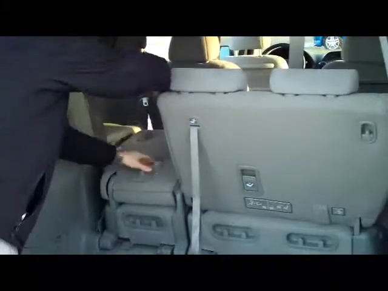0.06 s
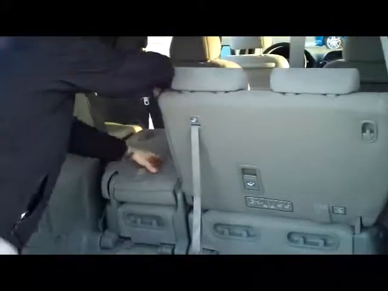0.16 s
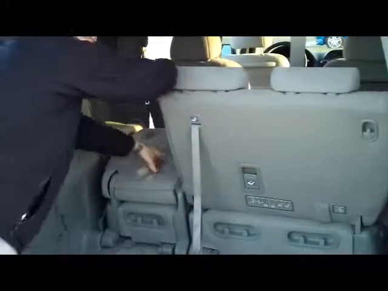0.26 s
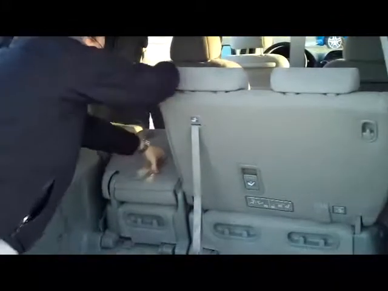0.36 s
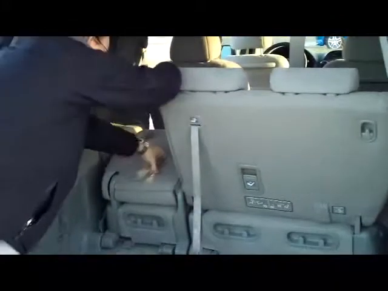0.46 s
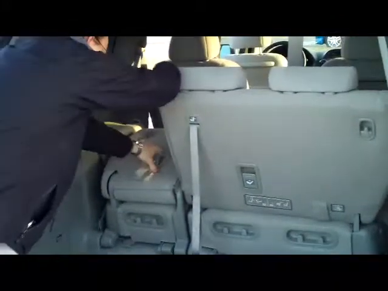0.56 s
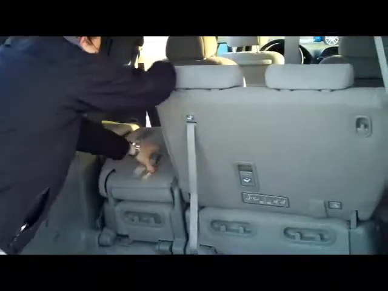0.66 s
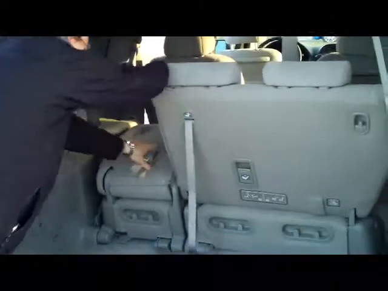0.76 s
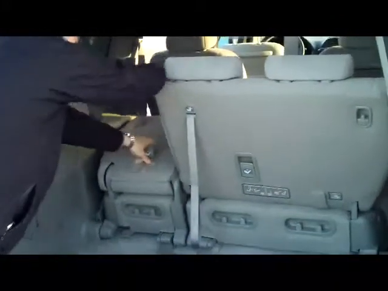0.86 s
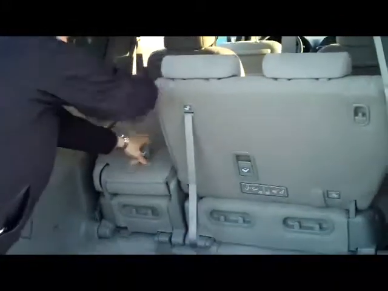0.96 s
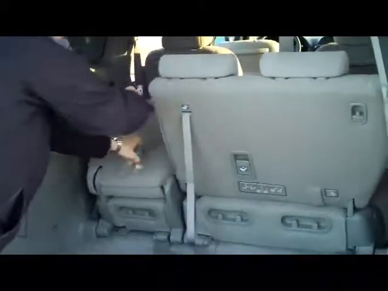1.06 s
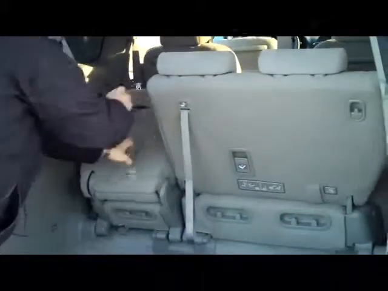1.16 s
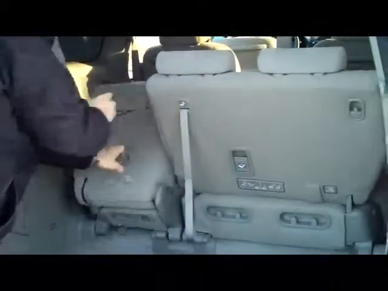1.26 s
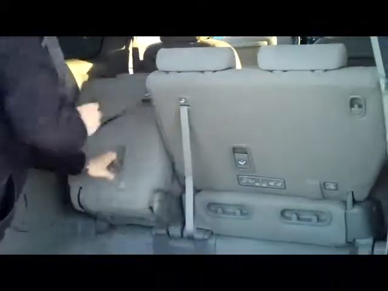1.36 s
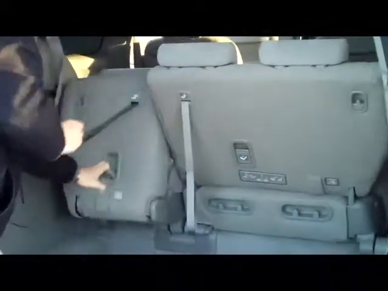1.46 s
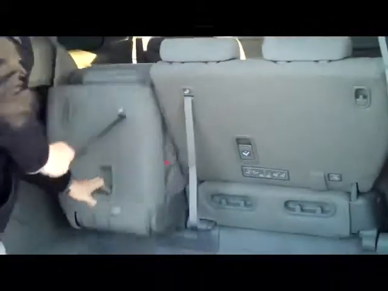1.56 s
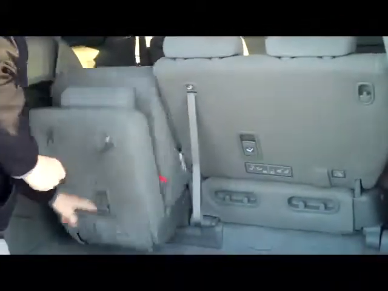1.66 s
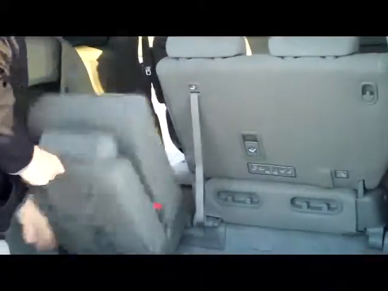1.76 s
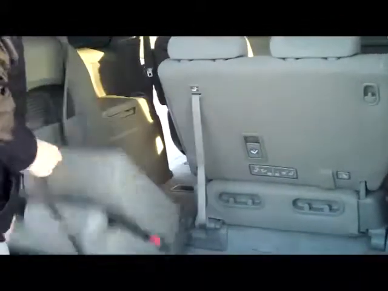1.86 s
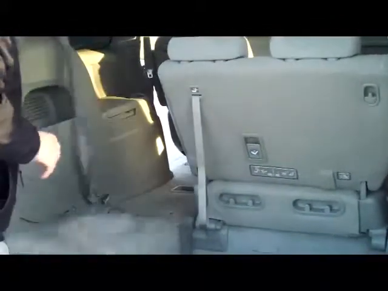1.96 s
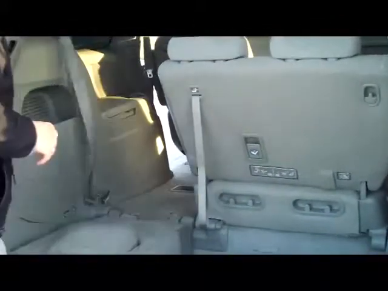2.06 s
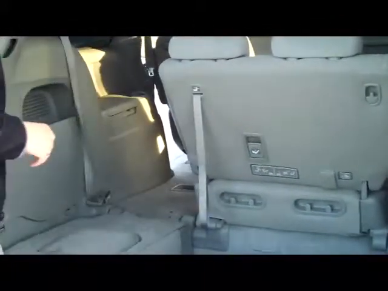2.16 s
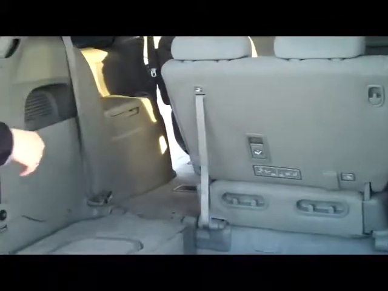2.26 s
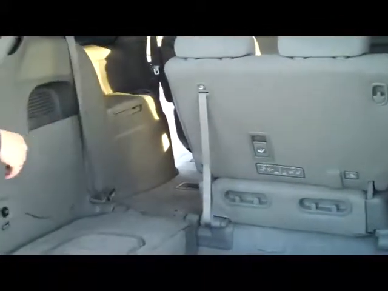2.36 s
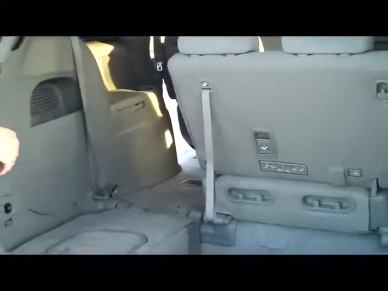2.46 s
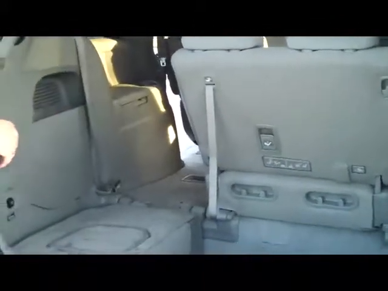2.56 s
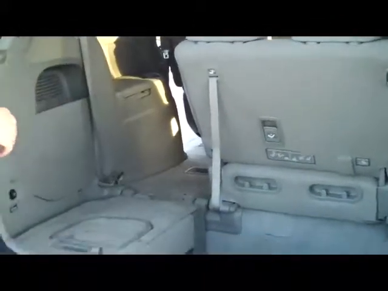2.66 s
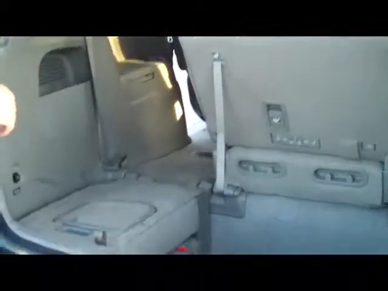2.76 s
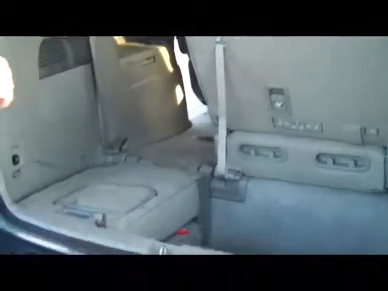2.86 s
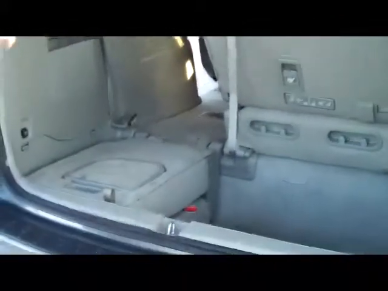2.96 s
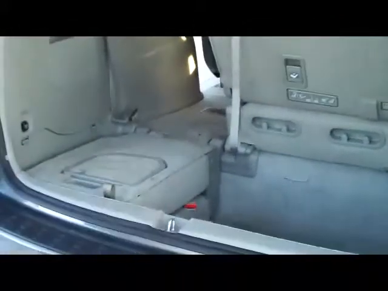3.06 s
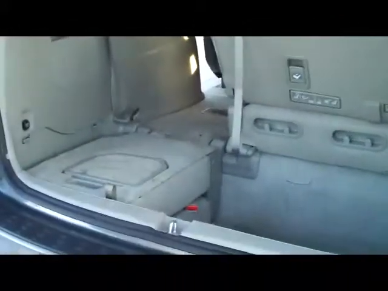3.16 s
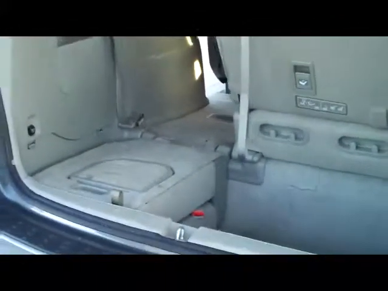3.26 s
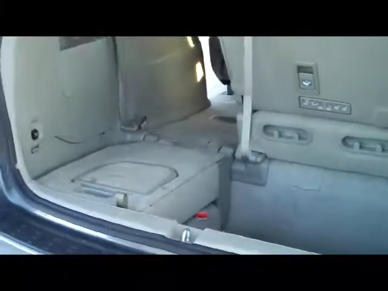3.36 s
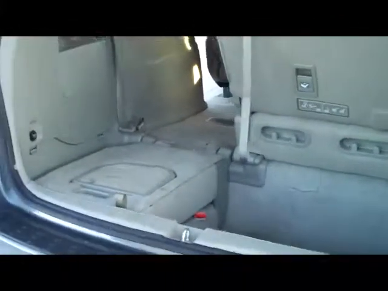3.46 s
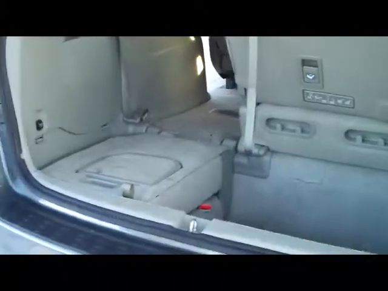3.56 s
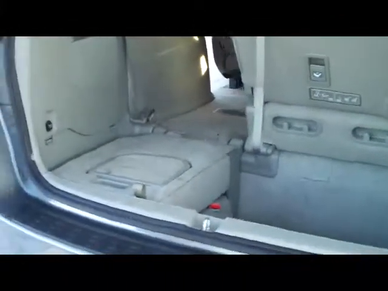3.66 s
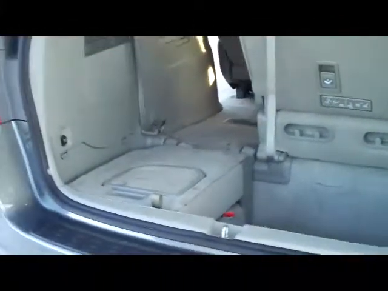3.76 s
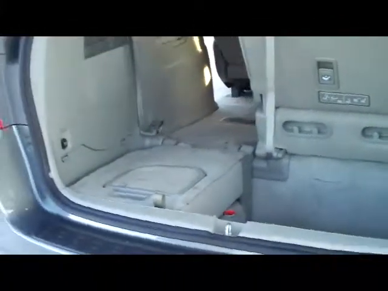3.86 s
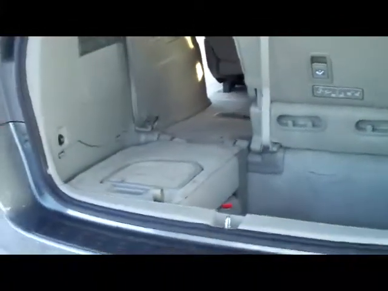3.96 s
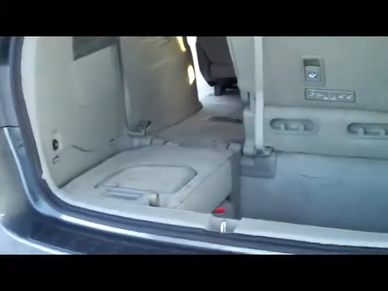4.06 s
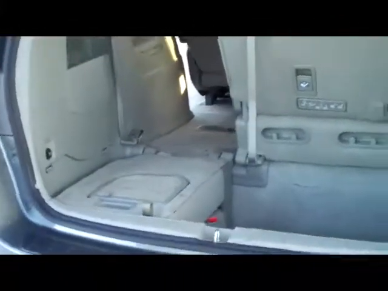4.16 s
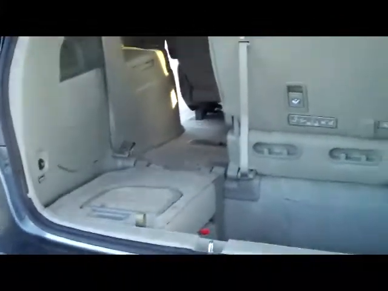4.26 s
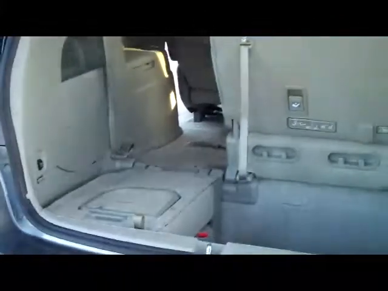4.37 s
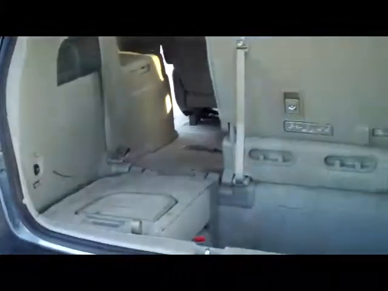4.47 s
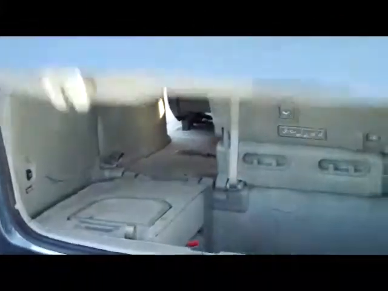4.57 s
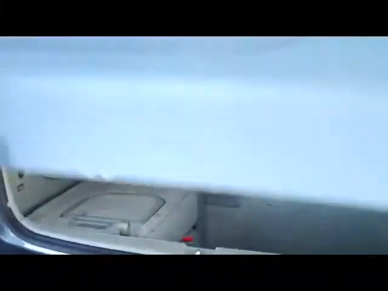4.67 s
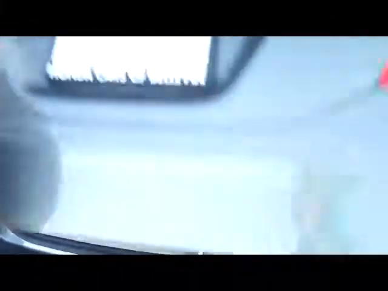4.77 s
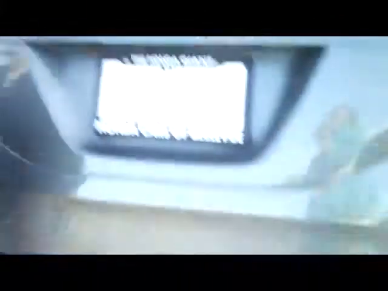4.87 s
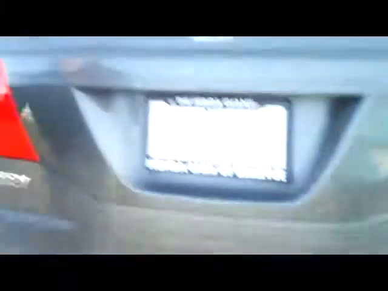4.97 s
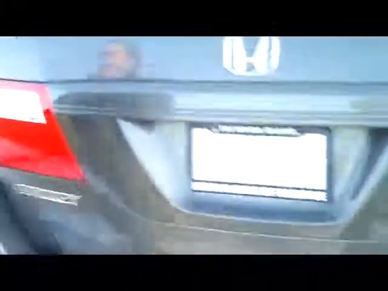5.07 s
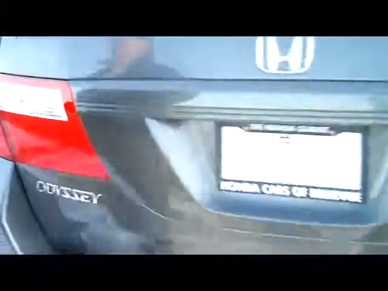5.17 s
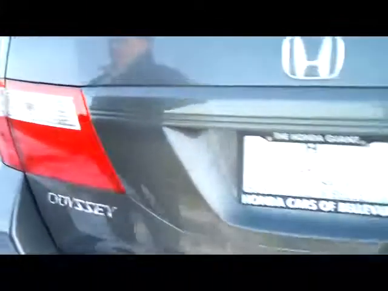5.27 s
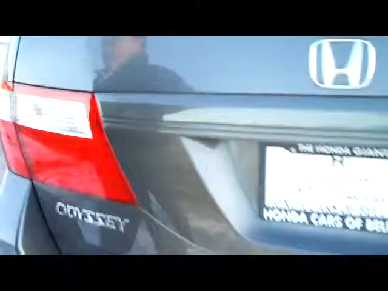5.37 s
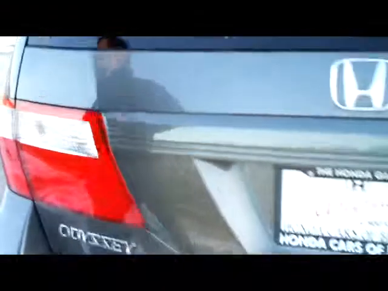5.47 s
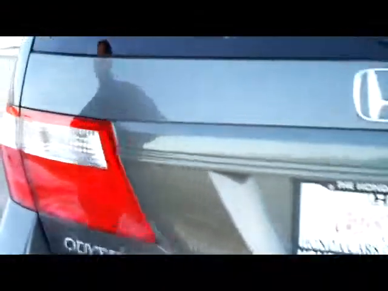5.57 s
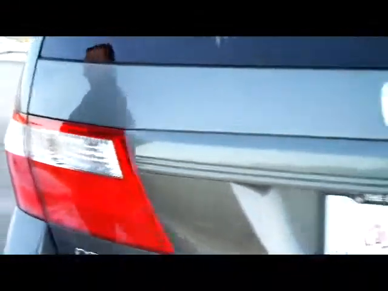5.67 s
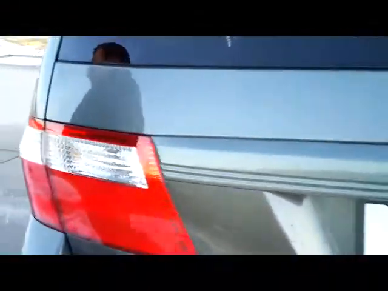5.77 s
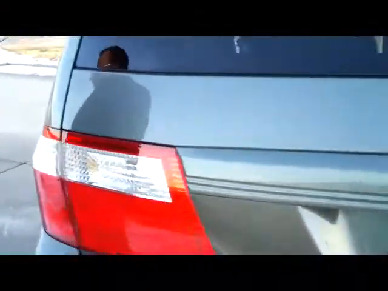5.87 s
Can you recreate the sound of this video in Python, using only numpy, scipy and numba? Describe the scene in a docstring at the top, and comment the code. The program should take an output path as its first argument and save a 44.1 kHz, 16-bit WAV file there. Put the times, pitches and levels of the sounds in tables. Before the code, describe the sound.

A small handheld camera, mono and slightly hissy, hears faint traffic outside an open van. Light knocks and creaks lead to a folding seat dropping heavily into the floor, with quick bouncing clatter and a short metal ring. Quiet foot scuffs follow. A sudden airy strut hiss accompanies the closing tailgate, thins out, and gives way to a huge deep slam with fluttering plastic rattles.

```python
"""Traffic rumble and a camera's thin whine come first, outdoors behind a van, as a hand works a strap.
Feet shuffle; the rear seat creaks, tumbles into its well and latches, all knocks of noise grit and struck modes.
Gas struts hiss as filtered jet noise while the tailgate swings down on whining hinges.
It slams, booms on damped low modes, and its trim rattles and buzzes with the shaking panel.
The small one-microphone camera cuts the top and clips the loudest peaks."""
import sys
import numpy as np
from scipy import signal
from scipy.fft import rfft, irfft
from scipy.io import wavfile
from scipy.ndimage import uniform_filter1d
from numba import njit

SR = 44100
rng = np.random.default_rng(int(sys.argv[2]) if len(sys.argv) > 2 else 0)


def generate_wav(signal):
    """Clip the signal to [-1, 1] and save it as 16-bit WAV at the path in sys.argv[1]."""
    frames = np.transpose(np.atleast_2d(signal))
    scaled = np.clip(frames, -1, 1) * 32767
    pcm = np.round(scaled).astype(np.int16)
    wavfile.write(sys.argv[1], SR, pcm)


N = 261513

# Slow swell of the rumble under the traffic: start_s, level_db
RUMBLE_SWELL = [(0, -23.5), (.16, -36.5), (.68, -40), (1.39, -40.5), (1.97, -33), (2.08, -43), (2.35, -40),
                (3.34, -40.5), (3.9, -35.5), (4.3, -35), (4.66, -38.5), (5.2, -40.5)]
# Spectrum of distant traffic and hiss, before levelling: pitch_hz, relative_db (per Hz)
TRAFFIC_SPECTRUM = [(14, -32), (24, 2.5), (44, 2), (160, -15.5), (314, -26.5), (360, -26.5), (401, -29.5),
                    (727, -26.5), (1780, -33.5), (1930, -38), (2150, -37.5), (2330, -40), (6700, -49),
                    (8780, -31.5), (15500, -65.5)]
TRAFFIC_DB = -50
# Steady camera whines: pitch_hz, level_db (rms)
CAMERA_WHINES = [(7865, -65), (11999, -81), (14987, -79)]
# Resonances of the microphone's cavity: pitch_hz, width_hz, relative_db
MIC_CAVITY = [(8270, 570, 5.5), (8890, 3500, -3.5)]
TICK_HZ = 100
TOP_HZ = 15300

# Upholstery, strap and clothes rubbing: start_s, scrape_db, swish_db
RUB_LEVELS = [(0, -38.5, -50), (.12, -66, -67), (.95, -62, -58.5), (1.1, -56, -60), (1.35, -43.5, -57),
              (1.68, -45.5, -67), (2.06, -46.5, -55), (2.16, -38.5, -49), (2.45, -50, -62.5),
              (2.66, -66, -67), (3.1, -55.5, -56), (3.42, -65, -63), (3.7, -46, -51.5), (3.9, -52.5, -57),
              (4.14, -51.5, -64), (4.45, -53.5, -48), (4.86, -48, -48), (5.16, -52.5, -49),
              (5.23, -42, -44)]
# Resonances of the cushion: pitch_hz, width_hz, relative_db
CUSHION_BODY = [(260, 114, 4), (666, 78, 5.5), (1018, 290, -3.5), (1714, 167, -2), (2490, 680, -10.5)]

# Knocks of feet, seat and tailgate; the hollow and sizzle levels are relative to the clack:
# start_s, clack_db, hollow_db, sizzle_db, clack_t60_s
SHUFFLE_KNOCKS = [(0.0678, -53, 8.5, -14, 0.16), (0.3947, -49, 0, -7, 0.16), (0.559, -54.5, 6, -7, 0.057),
                  (0.8242, -45, -12, -9, 0.11), (2.83, -52, 3.5, -9, 0.27), (2.86, -46, 7, -18, 0.11),
                  (2.88, -56.5, 14, -9, 0.28), (2.9579, -46, -7, 1, 0.068), (3.0355, -48, 17.5, -10, 0.058),
                  (3.156, -58, 13, 6, 0.061), (3.5107, -57, 6.5, 7.5, 0.23), (3.6037, -53.5, -9, 8, 0.29),
                  (3.6775, -44, -3, -15, 0.24), (3.8591, -50.5, 12, -1, .12), (4.018, -46, -3, 6.5, 0.11),
                  (4.1256, -50.5, 11, 18, .015), (4.134, -48.5, 11, -10, 0.061),
                  (4.922, -51.5, 12, 1, 0.092), (5.9049, -41, 10.5, -2.5, 0.068)]
SEAT_KNOCKS = [(1.0224, -42, -2.5, -21, 0.068), (1.099, -52.5, 6, -10, 0.046), (1.1172, -45.5, -10, 0, .04),
               (1.1713, -44, 4, 0, 0.032), (1.2729, -53, 9, 1, 0.15), (1.4199, -49, 2, -5, 0.18),
               (1.5001, -51, -20, -7, 0.41), (1.7366, -54.5, 20.5, -13, .04),
               (1.7748, -49.5, 19.5, -6, .07), (1.807, -38.5, -8, -13, 0.11),
               (1.8402, -24.5, -9, 12.5, 0.037), (1.8713, -28, -12.5, -11, 0.034),
               (2.098, -40, -9.5, 10, 0.067), (2.112, -47, -16.5, 14, 0.14),
               (2.1346, -31.5, -22.5, 1, 0.018), (2.1722, -32.5, 12, 9.5, 0.06),
               (2.1972, -7, 0.5, -5.5, 0.039), (2.212, -28, 1, -5, 0.085), (2.2465, -21.5, -1, -9, 0.06),
               (2.3007, -21, -2, -13, 0.062), (2.3489, -42, 13, -2, 0.085), (2.3675, -35, -10, -8, 0.062)]
GATE_KNOCKS = [(5.234, -47, 22.5, -9, 0.052), (5.2426, -14.5, 14.5, -1, .02), (5.249, -25, 5, 4, 0.029),
               (5.276, -31, 13, -5, 0.093), (5.3056, -26.5, 8, -4, 0.16), (5.342, -23.5, 2, -13, 0.044),
               (5.357, -20.5, -14, -22, 0.051)]
# Rise of a knock as a share of its t60
SHUFFLE_RISE, SEAT_RISE, GATE_RISE = 0.036, 0.077, .045

# Resonances that colour the knocks: pitch_hz, width_hz, relative_db
SEAT_RESONANCES = [(109.5, 17, -7.5), (143, 59, 8.5), (180.6, 22, 8.5), (221.3, 12, 6), (302, 40, -0.5),
                   (426, 100, 5), (571.5, 18, 7), (626, 42, 4), (1040, 71, -2), (2000, 32, 4),
                   (2546, 27, 2), (3053, 130, 9), (4810, 67, -24.5)]
GATE_RESONANCES = [(135, 32, 10), (175, 9.5, 15.5), (450, 610, -11), (220, 29, 11.5), (279, 12, 9),
                   (319, 32, 11), (648, 46, -2), (890, 50, -33), (1092, 61, 5.5), (1380, 87, 3.5),
                   (1850, 220, -5.5), (2450, 43, 3), (3170, 200, -5), (3380, 39, -15), (4100, 170, -23)]
# Blows that shake the low modes: start_s, strength_db, contact_s
SEAT_PUSHES = [(2.156, 2, 0.00099), (2.181, -10, 0.0031), (2.2, 0, 0.0037), (2.228, 0, 0.0052),
               (2.296, -15.5, 0.0043), (2.347, -8.5, 0.0053)]
GATE_PUSHES = [(5.241, -1.5, 0.0018), (5.28, -1.5, 0.0051), (5.303, 1.3, 0.0034), (5.314, 2.5, 0.0043),
               (5.343, -6.5, 0.0083), (5.379, -2.5, 0.0043), (5.416, -12.5, 0.0072)]
# Damped modes: pitch_hz, relative_db, t60_s, first_swing (1 toward the microphone, -1 away)
SEAT_MODES = [(23.6, -27, 1, 1), (41.1, -17.5, 0.23, -1), (63.24, -28, 1, -1), (115, -19.5, 0.12, -1),
              (159, -25, 0.17, 1), (181, -24.5, 0.23, -1), (229, -28, 0.17, 1)]
GATE_MODES = [(17.1, -1.5, 0.33, -1), (23.63, -2.5, 0.94, 1), (36.1, -3, 1.1, 1), (43.26, -25.5, 1.54, 1),
              (70.7, -24.5, 1.66, -1), (114.6, -13.5, 0.22, -1), (194.7, -27, 0.52, 1), (1070, -32, 1.0, 1)]
# The latch bar ringing on: pitch_hz, level_db, t60_s, first_swing (1 or -1)
LATCH_MODES = [(352, -55, 4.6, 1), (2073, -49, 2.2, 1), (3000, -60.5, 0.76, 1), (3290, -30, 0.36, 1)]
LATCH_S = 2.2

# Seat pivots and handle groaning under load: start_s, length_s, first_hz, last_hz, level_db
PIVOT_CREAKS = [(1.17, .14, 560, 826, -50), (1.32, .08, 805, 720, -57), (1.41, 0.15, 700, 650, -45.5),
                (1.685, 0.087, 1055, 960, -52), (4.015, .17, 553, 527, -49)]
# The tailgate's hinges whining as it swings: start_s, length_s, first_hz, last_hz, level_db
HINGE_CREAKS = [(4.36, 0.31, 462, 503, -52.5), (4.57, .19, 500, 533, -51.5),
                (4.765, 0.083, 376, 373, -46.5), (4.84, .11, 530, 596, -59)]
# Strands that glide together in a creak: pitch_multiple, width_hz, relative_db
PIVOT_STRANDS = [(1, 50., 0), (1.62, 70., -3), (2.75, 120., -5), (3.3, 140., -6)]
HINGE_WHINE_STRANDS = [(1, 25., 0), (2, 35., -3), (3, 50., -9)]

# Gas forced through the strut valves, around which levels and pitch waver:
# start_s, hiss_db, whistle_hz, whistle_db
STRUT_GAS = [(4.22, -68, 5540, -76), (4.33, -44.5, 5800, -55), (4.372, -41.5, 6300, -50),
             (4.404, -36.5, 6950, -30), (4.47, -34.5, 6680, -38), (4.57, -35, 7140, -44),
             (4.67, -43.5, 7230, -47.5), (4.8, -47, 6900, -48), (5.025, -47.5, 6950, -49),
             (5.05, -56, 6900, -72), (5.2, -64, 6900, -79)]
# Resonances of the strut tubes: pitch_hz, width_hz, relative_db
STRUT_TUBE = [(7450, 400, -2), (9710, 180, 0), (10400, 200, 0), (11300, 200, 0), (12300, 180, 2),
              (13400, 400, 1), (14400, 400, -4)]
# Whistles that stay near one pitch; follow_share is how much of the hiss's swell in dB they follow:
# pitch_hz, filter_width_hz, level_db (at the loudest hiss), follow_share
STRUT_WHISTLES = [(8400, 380., -38, .95), (5650, 130., -53, .4), (4950, 120., -60, .4),
                  (3550, 160., -64, .3)]

SLAM_S = 5.24
# The shut panel swings on: first rattle, first swing, each swing this share of the last
RATTLE_S, SWING_S, QUICKENS = 5.3225, .0632, .968
RATTLE_COUNT = 7  # swings
# Trim hits on each swing, before the fade; hollow and sizzle are relative to the clack:
# swing_share, clack_db, hollow_db, sizzle_db, clack_t60_s
TRIM_HITS = [(0, -13, -13, -7, 0.052), (.52, -23, 3.5, -7, 0.13)]
# Levels lost FADE_S after the slam, slowly at first
RATTLE_FADE_DB, BUZZ_FADE_DB, FADE_S, FADE_POWER = 37, 26, .43, 3.08
# Loose trim buzzing between the rattles: level, with hollow part and sizzle relative to it
BUZZ_DB, BUZZ_HOLLOW_DB, BUZZ_SIZZLE_DB = -32, 6, -6
LINGER_DB, LINGER_T60_S = -45, 2.76  # a faint part of the buzz dies slowly


def undb(db):
    """Decibels to amplitude."""
    return 10 ** (np.asarray(db) / 20)


def unit(x):
    """Scale to rms 1."""
    return x / np.sqrt(np.mean(x ** 2))


def curve(table):
    """Columns at every sample, joined by straight lines."""
    s, *columns = np.transpose(table)
    t = np.arange(N) / SR
    return [np.interp(t, s, column) for column in columns]


def inside(table, fade_s=.03):
    """1 while a curve lasts, fading to 0 around it."""
    t = np.arange(N) / SR
    margin_s = np.minimum(t - table[0][0], table[-1][0] - t)
    return np.clip(margin_s / fade_s + 1, 0, 1)


@njit
def svf(x, hz, width):
    """State-variable band-pass with a moving centre, gain 1 there."""
    y, b, l = np.empty(len(x)), 0., 0.
    for i in range(len(x)):
        g, k = np.tan(np.pi * hz[i] / SR), width / hz[i]
        v = (b + g * (x[i] - l)) / (1 + g * (g + k))
        b, l, y[i] = 2 * v - b, l + 2 * g * v, k * v
    return y


def band(x, lo_hz, hi_hz):
    """Butterworth band-pass."""
    return signal.sosfilt(signal.butter(2, [lo_hz, hi_hz], "band", fs=SR, output="sos"), x)


def ring(x, modes):
    """Damped modes struck by x."""
    out = 0
    for hz, db, t60, side in modes:
        pole = np.exp(2j * np.pi * hz / SR - np.log(1000) / (t60 * SR))
        swing = signal.lfilter([1], [1, -pole], x).imag
        out = out + np.sign(side) * undb(db) * swing
    return out


def resonate(x, peaks, waver=0.):
    """Broad resonances of a body, alternating in sign; waver moves their centres by that share."""
    drift = np.ones(N) + waver
    out = 0
    for k, (hz, width_hz, db) in enumerate(peaks):
        out = out + (-1) ** k * undb(db) * svf(x, hz * drift, 1. * width_hz)
    return out


def walk(rate):
    """Random levels held 1 / rate s and slewed twice."""
    hold = int(SR / rate)
    steps = np.repeat(rng.standard_normal(N // hold + 1), hold)
    slewed = uniform_filter1d(uniform_filter1d(steps, hold), hold)
    return 1.42 * slewed[:N]


def grit():
    """Dense tiny contacts of very uneven size."""
    sizes = undb(3 * np.minimum(rng.exponential(size=N), 6))
    return unit(rng.standard_normal(N) * sizes)


def three_parts(hollow, clack, sizzle, body, ring_share):
    """Contact grit under three envelopes; the body colours the lower two."""
    def coloured(x):
        return x + ring_share * resonate(x, body)

    out = sizzle * unit(band(grit(), 6100, 12270))
    for envelope, lo_hz, hi_hz in ((hollow, 120, 1600), (clack, 1400, 6200)):
        contacts = grit()
        part = band(coloured(envelope * contacts), lo_hz, hi_hz)
        # The same grit without its envelope sets the level
        steady = band(coloured(contacts), lo_hz, hi_hz)
        out = out + part / np.std(steady)
    return out


def knocks(table, body, rise_share, hollow_lasts, tail_db, tail_lasts):
    """Each knock is a flurry of contacts; its parts die at different rates and the cabin adds a weak tail."""
    t = np.arange(SR // 2) / SR
    envelopes = np.zeros((3, N + SR))
    for s, db, hollow_db, sizzle_db, t60 in table:
        rise_s = rise_share * t60
        rise = np.sqrt(np.minimum(t / rise_s, 1))
        after = np.maximum(t - rise_s, 0) / t60
        parts = zip(envelopes, (hollow_db, 0, sizzle_db), (hollow_lasts, 1, .8))
        for envelope, rel_db, lasts in parts:
            fall = undb(-60 * after / lasts)
            tail = undb(tail_db - 60 * after / (lasts * tail_lasts))
            envelope[int(s * SR):][:len(t)] += undb(db + rel_db) * rise * (fall + tail)
    return three_parts(*envelopes[:, :N], body, ring_share=1.09)


def boom(blows, modes):
    """Smooth raised-cosine pushes shake panel, floor and cabin air."""
    force = np.zeros(N)
    for s, db, contact_s in blows:
        push = np.hanning(int(contact_s * SR))
        force[int(s * SR):][:len(push)] += undb(db) * push / push.sum()
    return ring(force, modes)


def street():
    """Distant traffic and hiss as shaped noise; the rumble under it swells on its own."""
    hz, db = np.transpose(TRAFFIC_SPECTRUM)
    f = np.maximum(np.arange(N // 2 + 1) * SR / N, 1)
    shape = undb(np.interp(np.log(f), np.log(hz), db))
    noise = irfft(rfft(rng.standard_normal(N)) * shape, N)
    low = signal.sosfiltfilt(signal.butter(2, 140, fs=SR, output="sos"), noise)
    high = (noise - low) / np.std(band(noise, 130, 7000))
    rumble_db = curve(RUMBLE_SWELL)[0] + 1.55 * walk(6)
    traffic_db = TRAFFIC_DB + 1.2 * walk(5)
    return undb(rumble_db) * unit(low) + undb(traffic_db) * high


def camera():
    """Hiss, thin steady whines and faint regular ticks of uneven size ringing in the microphone's cavity."""
    t = np.arange(N) / SR
    ticks = np.zeros(N)
    at_s = np.arange(.0035, N / SR, 1 / TICK_HZ)
    ticks[(at_s * SR).astype(int)] = undb(4.5 * rng.standard_normal(len(at_s)))
    ticks = svf(ticks, np.full(N, 8800.), 1600.)
    out = undb(-70) * unit(resonate(rng.standard_normal(N), MIC_CAVITY))
    out = out + undb(-59.0) * unit(resonate(ticks, MIC_CAVITY))
    for hz, db in CAMERA_WHINES:
        out = out + np.sqrt(2) * undb(db) * np.sin(2 * np.pi * hz * t)
    return out


def rubbing():
    """Uneven slips sound the cushion's wandering resonances; cloth swishes above."""
    scrape = unit(resonate(grit(), CUSHION_BODY, 0.12 * walk(13))) * undb(1.5 * walk(40))
    swish = unit(band(grit(), 2000, 22000)) * undb(1.5 * walk(50))
    scrape_db, swish_db = curve(RUB_LEVELS)
    return inside(RUB_LEVELS) * (undb(scrape_db) * scrape + undb(swish_db) * swish)


def shuffle():
    """Shuffling feet: soft flurries of contact grit coloured by the cushion's resonances."""
    return knocks(SHUFFLE_KNOCKS, CUSHION_BODY, SHUFFLE_RISE, hollow_lasts=.8, tail_db=-30, tail_lasts=3.0)


def seat():
    """The seat's knocks, its thud in the well and the latch bar ringing on."""
    strike = np.zeros(N)
    strike[int(LATCH_S * SR)] = 1
    tumble = knocks(SEAT_KNOCKS, SEAT_RESONANCES, SEAT_RISE, hollow_lasts=1.31, tail_db=-35.5, tail_lasts=8.9)
    return tumble + boom(SEAT_PUSHES, SEAT_MODES) + ring(strike, LATCH_MODES)


def creaks(table, strands):
    """Stick-slip in a pivot: each creak swells and dies while its rough strands glide together."""
    t = np.arange(N) / SR
    points, swell = [], 0
    for s, length, first_hz, last_hz, db in table:
        points += [(s, first_hz), (s + length, last_hz)]
        swell = swell + undb(db) * np.sin(np.pi * np.clip((t - s) / length, 0, 1))
    glide_hz = curve(points)[0]
    slips = grit() * undb(2 * walk(29.95))
    rough = sum(undb(db) * unit(svf(slips, k * glide_hz, width_hz)) for k, width_hz, db in strands)
    return swell * rough


def whistle(hz, width_hz):
    """A narrow jet tone, noise through two band-passes, that wavers in pitch and breaks up."""
    hz = hz * (1 + .007 * walk(60))
    wide = svf(rng.standard_normal(N), hz, 3.3 * width_hz)
    return undb(2 * walk(25)) * unit(svf(wide, hz, width_hz))


def struts():
    """Jet noise in the tube resonances, a gliding whistle and some steady ones."""
    hiss_db, glide_hz, glide_db = curve(STRUT_GAS)
    tube = resonate(rng.standard_normal(N), STRUT_TUBE, .006 * walk(25))
    air = 0.4 * band(rng.standard_normal(N), 8400, 13000)
    out = undb(hiss_db + 1.7 * walk(40)) * unit(tube + air)
    swell_db = hiss_db - hiss_db.max()
    for hz, width_hz, db, follows in STRUT_WHISTLES:
        out = out + undb(db + follows * swell_db) * whistle(hz, width_hz)
    out = out + undb(glide_db) * whistle(glide_hz, 160.0)
    return inside(STRUT_GAS) * out


def fade(s):
    """How far the shaking has died since the slam, 1 after FADE_S."""
    return (np.maximum(s - SLAM_S, 0) / FADE_S) ** FADE_POWER


def rattles():
    """Knock rows: two hits a swing, the swings quickening and the hits fading."""
    rows, s = [], RATTLE_S
    for k in range(RATTLE_COUNT):
        swing_s = SWING_S * QUICKENS ** k
        for share, db, *rest in TRIM_HITS:
            hit_s = s + share * swing_s
            rows.append((hit_s, db - RATTLE_FADE_DB * fade(hit_s), *rest))
        s += swing_s
    return rows


def trim_buzz():
    """Loose trim buzzes as contact grit from the slam on, wavering as it dies."""
    t = np.arange(N) / SR
    main = undb(BUZZ_DB - BUZZ_FADE_DB * fade(t))
    linger = undb(LINGER_DB - 60 * (t - SLAM_S) / LINGER_T60_S)
    onset = np.clip((t - SLAM_S) / 0.0066, 0, 1)
    level = onset * (main + linger) * undb(2.9 * walk(60))
    hollow, sizzle = level * undb(BUZZ_HOLLOW_DB), level * undb(BUZZ_SIZZLE_DB)
    return three_parts(hollow, level, sizzle, GATE_RESONANCES, ring_share=2.7)


def tailgate():
    """Slam, boom, rattles twice a swing of the panel and a buzz between them."""
    hits = GATE_KNOCKS + rattles()
    slam = knocks(hits, GATE_RESONANCES, GATE_RISE, hollow_lasts=1.25, tail_db=-40, tail_lasts=2.1)
    return slam + boom(GATE_PUSHES, GATE_MODES) + trim_buzz()


def scene():
    """One microphone feeds both channels."""
    mono = street() + camera() + rubbing() + shuffle() + seat()
    mono = mono + creaks(PIVOT_CREAKS, PIVOT_STRANDS) + struts()
    mono = mono + creaks(HINGE_CREAKS, HINGE_WHINE_STRANDS) + tailgate()
    return np.array([mono, mono])


def record(dry):
    """The camera clips at full scale, cuts the top steeply and clips what overshoots."""
    steep = signal.ellip(10, .2, 70, TOP_HZ, fs=SR, output="sos")
    clipped = np.clip(dry, -1, 1)
    return np.clip(signal.sosfilt(steep, clipped), -1, 1)


dry = scene()
out = record(dry)
generate_wav(out)
```